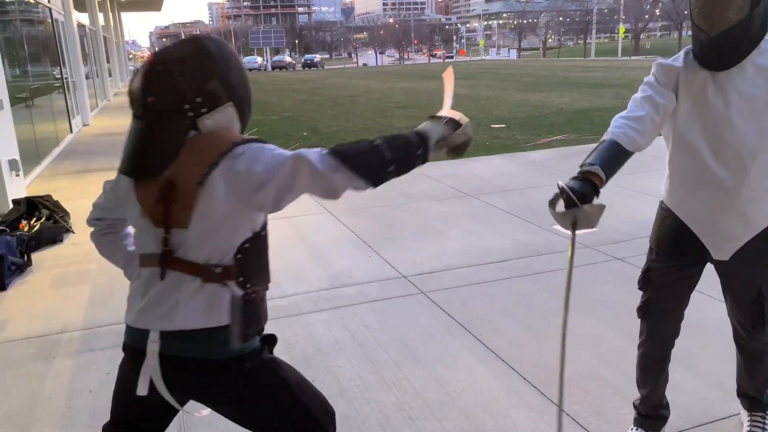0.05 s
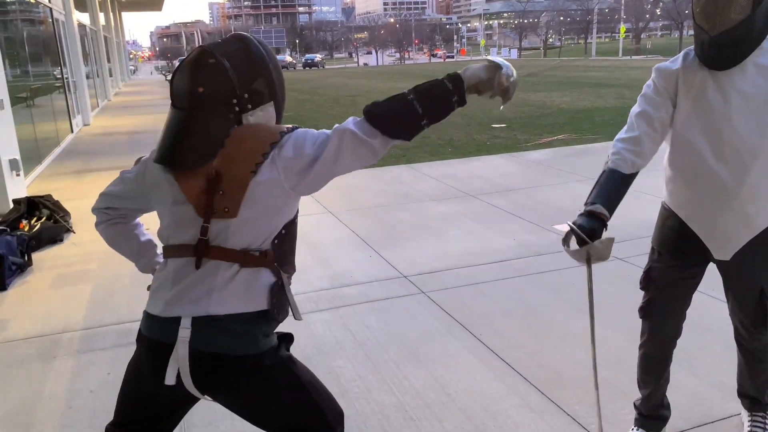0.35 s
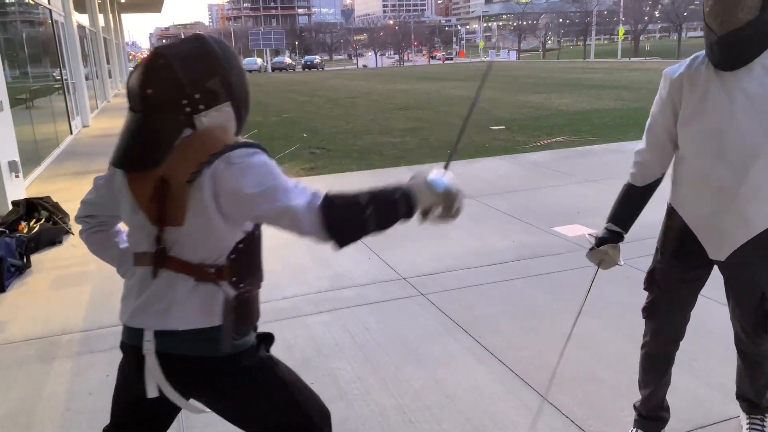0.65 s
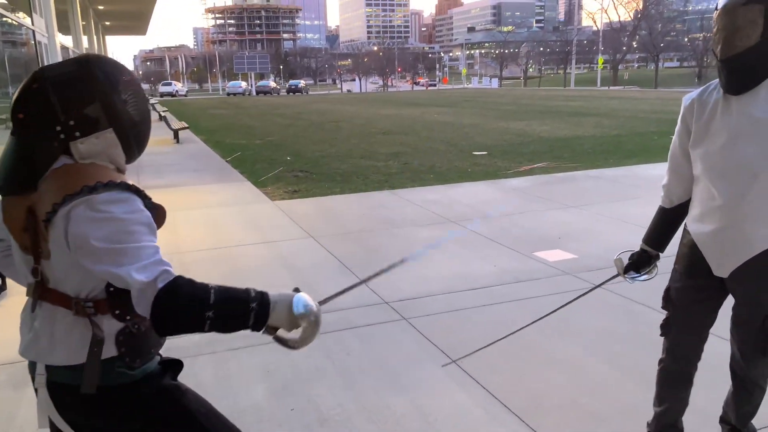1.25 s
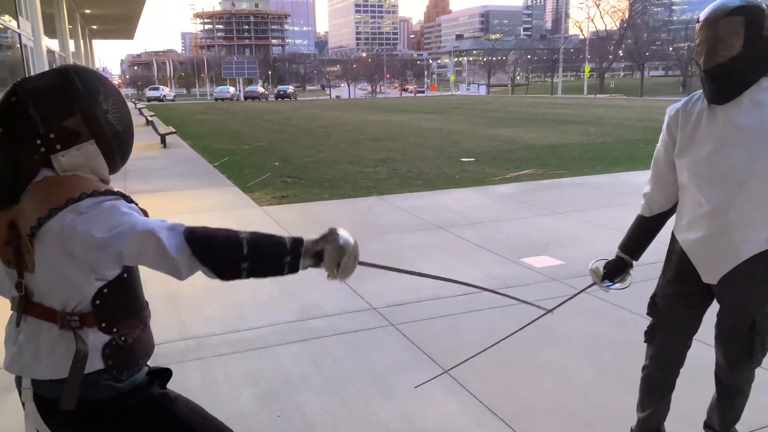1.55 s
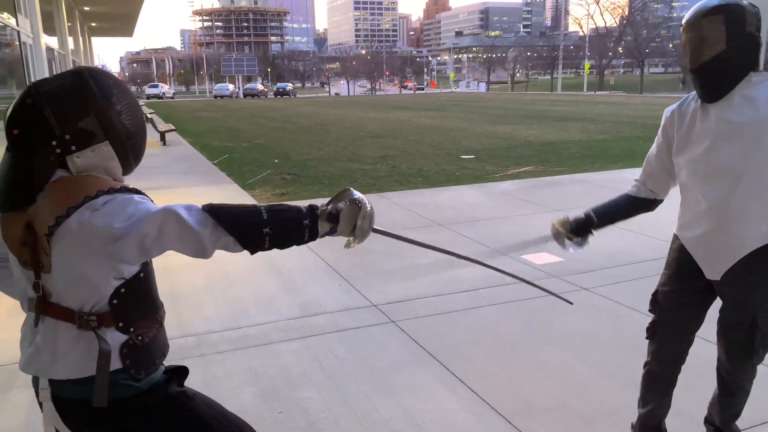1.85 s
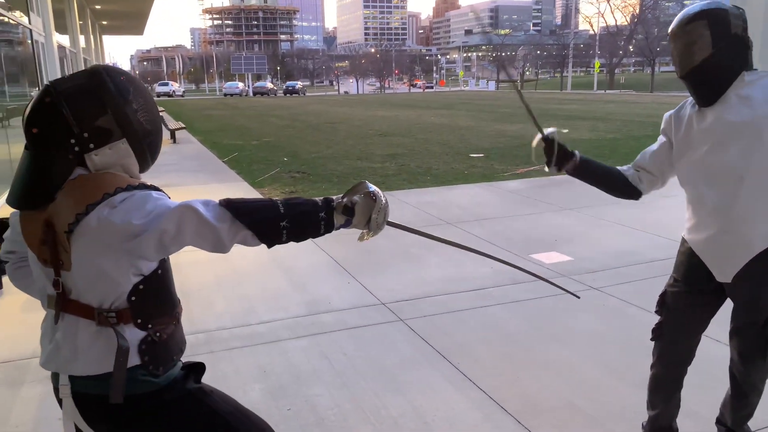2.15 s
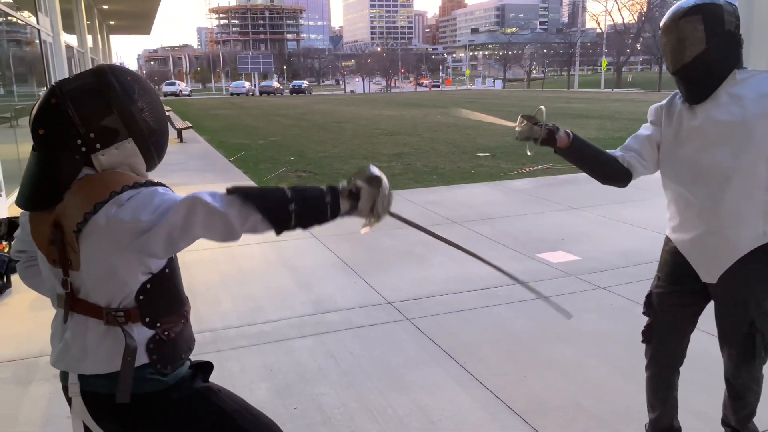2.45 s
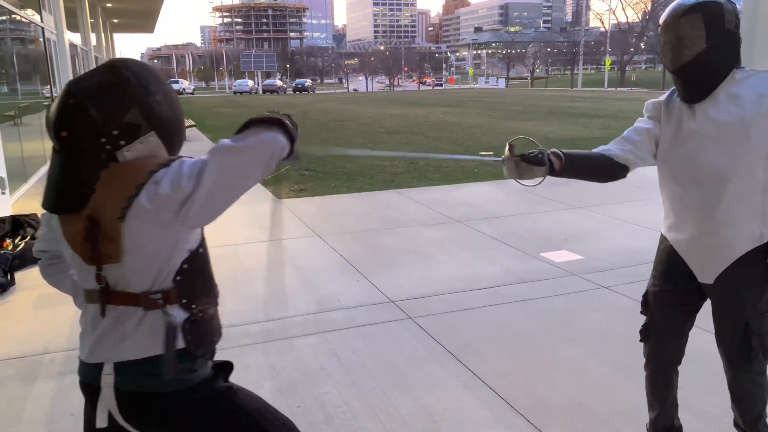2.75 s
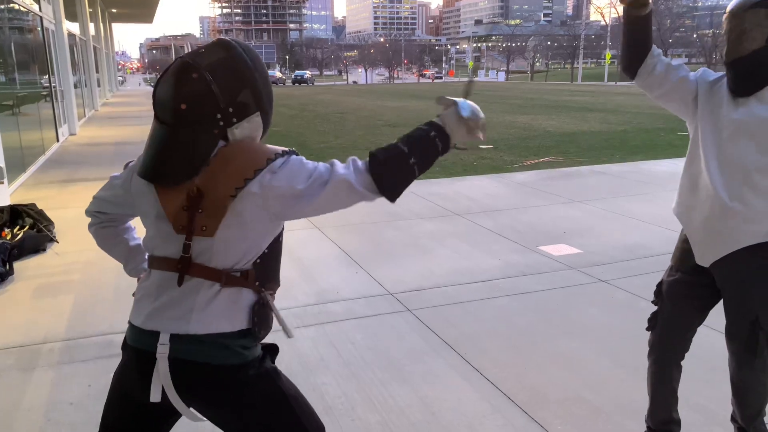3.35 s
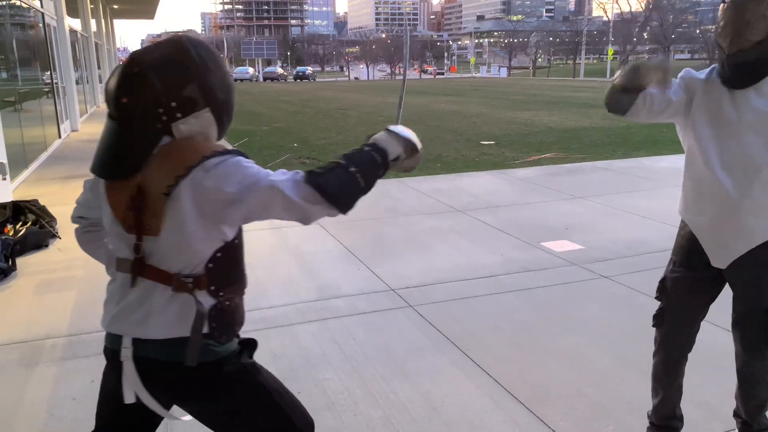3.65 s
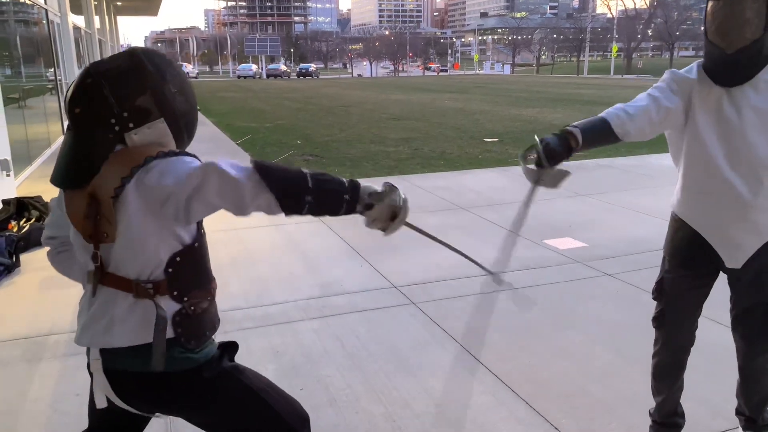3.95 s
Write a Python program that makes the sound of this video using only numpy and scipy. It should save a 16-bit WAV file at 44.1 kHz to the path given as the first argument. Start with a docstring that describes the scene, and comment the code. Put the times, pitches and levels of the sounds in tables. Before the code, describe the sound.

Steel sabres clash close by on an open plaza: one hit, a light clink, a pause, then three louder ringing strikes with a soft echo. Faint town traffic rumbles throughout.

```python
"""Sharp steel clashes crack and ring as two fencers spar with sabres on a concrete plaza, close by.
Each clash is a few quick contacts that set the blades' bending modes ringing; pavement and a near wall
scatter it, and far buildings send back a soft tail. Swung blades whistle faintly, a guard clinks,
buckles tick and a foot thuds once, while town traffic rumbles behind. A phone's limiter ducks the
hardest hits."""
import sys
import numpy as np
from scipy import signal
from scipy.fft import rfft, irfft
from scipy.io import wavfile
from scipy.ndimage import uniform_filter1d, minimum_filter1d, map_coordinates

SR = 44100
rng = np.random.default_rng(int(sys.argv[2]) if len(sys.argv) > 2 else 0)


def persist_wave(psi):
    """Save psi, clipped to +-1, as 16-bit WAV."""
    counts = np.round(np.clip(psi, -1, 1) * 32767).astype(np.int16)
    wavfile.write(sys.argv[1], SR, np.atleast_2d(counts).T)


N = 176400
T = np.arange(N) / SR
FREQS = np.maximum(np.fft.rfftfreq(N, 1 / SR), 1)

# EQ of the street rumble. Each row: frequency in Hz, relative level in dB.
TRAFFIC_EQ = [(20, -31.5), (30, -11), (50, 0), (115, 1), (185, -7.5), (240, -6.5), (400, -15), (650, -20.5),
              (1300, -23), (2000, -30), (3200, -43), (5000, -60), (8000, -64), (11000, -63.5), (16000, -85)]
# Fader ride on the rumble. Each row: time in seconds, level in dB.
TRAFFIC_RIDE = [(0, -45), (.9, -45.5), (1.6, -45.5), (2.4, -44.5), (3.2, -43), (4, -44.5)]
# Distant engines. Each row: pitch in Hz, width in Hz, mid-scene level in dB, rise in dB per second.
ENGINE_DRONES = [(109, 9, -59, 0.5), (130, 4.3, -59, 0.5), (228, 12, -59.5, 1.5), (286.6, 24, -60, 1.5),
                 (312, 45, -66.5, 5), (384.7, 28, -72.5, 6.5), (511, 45, -69, 5.5)]
# Stereo images of traffic and clash noise. Each row: frequency in Hz, left-right correlation.
TRAFFIC_IMAGE = [(60, .85), (290, .88), (480, 0.11), (700, -0.1), (1000, -.3), (1800, -0.41), (3000, 0.32)]
CLASH_IMAGE = [(200, .8), (900, 0.67), (2000, 0.15), (3500, 0.18), (6000, 0)]
# Buckle ticks. Each row: start in seconds, level in dB, centre in Hz, T60 in seconds.
BUCKLE_TICKS = [(1.076, -73.5, 6800, .08), (1.3447, -56, 8600, 0.0063), (1.363, -74, 7000, .03),
                (2.064, -70, 5500, 0.013)]
# Blade whistles. Each row: peak time in seconds, level in dB, centre in Hz, width in Hz,
# half length in seconds.
BLADE_SWISHES = [(2.54, -75, 4050, 250, 0.038), (3.214, -68, 2950, 150, .035),
                 (3.813, -64.5, 2420, 150, 0.043)]
# Modes of the guard's clink, the blades' short ring and the thin tones that sing on after it.
# Each row: frequency in Hz, relative level in dB, T60 in seconds.
GUARD_MODES = [(980, -53, .08), (2150, -46.5, .08), (2350, -50.5, 0.085), (2600, -58, 0.077)]
RING_MODES = [(605, -28, .2), (922, -21, .13), (1235, -20.5, .12), (1420, -14, 0.12), (1620, -12, .14),
              (1835, -11.5, .13), (1976, -10, .13), (2340, -19, .13), (2545, -18, .12), (3510, -12, .16),
              (3700, -10, .11), (3750, -11, 0.16), (4120, -10, 0.14), (4200, -7, .12), (4373, -14, .2),
              (4513, -12, .11), (4780, -12.5, 0.18), (5460, -11.5, 0.099), (6430, -8.5, .13),
              (7186, -6, .08), (7390, 0.5, .08), (7477, -5.5, .09), (8150, -4.5, .07), (7800, -2, .06),
              (9800, -3.5, 0.11), (9370, -7, 0.13), (10400, -3, 0.071), (10964, -4.5, .1), (11536, -4, .09)]
SINGING_MODES = [(2051, -42, 1.2), (2772, -36.5, 1.6), (2950, -44, 2), (3500, -46, 0.98),
                 (4377, -19.5, .42), (5700, -34.5, 0.43), (6700, -27.5, .5)]
# EQs of the far echo, near scatter and contact crack. Each row: frequency in Hz, relative level in dB.
ECHO_EQ = [(300, -11.5), (1500, -4), (2700, 0.5), (4300, 0), (7500, -3), (11000, -8.5), (16000, -27)]
SCATTER_EQ = [(150, -13.5), (330, -5), (560, -4.5), (760, -10), (1200, -3), (1700, -1), (2700, -1),
              (4300, 2), (6300, -0.5), (8500, 1.5), (11500, -3.5), (16000, -15.5)]
CRACK_EQ = [(150, -13.5), (600, -18), (1600, 0), (2700, -18.5), (4300, -2.5), (6000, -5), (8000, 4.5),
            (11500, 2.5), (16000, -1.5)]
# Decay of the far echo. Each row: frequency in Hz, T60 in seconds.
ECHO_DECAY = [(1000, 1.1), (2200, 0.55), (4000, 0.74), (6100, 0.52), (9000, 0.42), (15000, 0.18)]
# Hollow clangs of the guards. Each row: clash time in seconds, centre in Hz, width in Hz, boost in dB.
GUARD_CLANGS = [(0.2913, 634, 55, 9.5), (0.2913, 940, 90, 4.5), (0.2913, 1276, 110, 4.5),
                (0.2913, 1700, 90, 1.5), (2.6751, 1200, 55, 8.5), (2.6751, 4020, 170, 3.5),
                (2.6751, 1630, 250, 6), (2.6751, 5580, 120, 5.5), (3.2512, 884, 130, 11),
                (3.2512, 1412, 90, 6.5), (3.2512, 2030, 130, 2.5), (3.2512, 7280, 160, 4),
                (3.8735, 300, 35, 12.5), (3.8735, 913, 80, 6), (3.8735, 4170, 200, 1.5),
                (3.8735, 1857, 272, 6), (3.8735, 7860, 99, 8)]
# Blade chatter after the first touch. Each row: time in seconds, weight within its clash in dB.
BLADE_REBOUNDS = [(0.2941, 7), (0.302, -8), (1.2170, 3), (2.6770, 3.5), (2.6818, -3.5), (2.6917, -2.5),
                  (3.254, 4), (3.2566, 5), (3.2595, 2.5), (3.8751, 7.5), (3.8803, -0.5), (3.8850, -1),
                  (3.9030, -11)]
# The hits. Each row: start in seconds, level in dB, bass, treble and ring trims in dB, place on the
# blade from 0 to 1, then scatter, echo, bite and singing trims in dB.
SABRE_CLASHES = [(0.291, -12.5, 12.5, -13.5, -6.5, 0.14, 1.5, -7, 0.5, -13),
                 (1.2090, -33.5, 5, -22, 0.5, 1, 2.5, -6, -3, -12),
                 (2.675, 3.5, -2.5, 3, 3, .603, 3.5, -7, -0.5, 0),
                 (3.2511, 6.5, -2, 3.5, 0.5, .468, 1, -7, 0, -14.5),
                 (3.8734, 6.5, -4, 0.5, 0, .705, 0, -5.5, 3, -9)]

SWELL_DB, SWELLS_PER_S, BASS_LEFT_DB = 2.336, 8, 3.5
STEP_S, STEP_HZ, STEP_WIDTH_S, STEP_DB = 3.486, 84, 0.0055, -25.5
CLINK_S, CLINK_RISE_S = 1.218, .003
ECHO_DB, ECHO_BUILD_S, ECHO_BUILD_POWER = -44, 0.16, .3
SCATTER_DB, SCATTER_RISE_S, SCATTER_T60_S = -19.5, 0.0096, 0.22
WAVER_HZ, WAVER_DB, WAVERS_PER_S = 24, 8, 16
RING_DB, BEND_HZ, MODE_BLUR_HZ = -22, 6, 15
NODE_SHARE = 0.27  # what a mode still gets when struck on a node
CLUSTER_DB, CLUSTER_SPACING_HZ, CLUSTER_FULL_HZ = 5.76, 100, 2500
BITE_HZ, BITE_OCTAVES = 4300, 0.34
CRACK_DB, CRACK_T60_S, SNAP_DB, SNAP_T60_S = -8, .035, -9, 0.0028
LIMIT_DB, LIMIT_HOLD_S, LIMIT_RELEASE_DB_PER_S = -10, 0.097, 78
SPLIT_HZ, OPPOSED_HZ, PORT_LAG_S, TOP_HZ = 6900, 8650, .000206, 15900


def undb(db):
    """Decibels to gain."""
    return 10 ** (np.asarray(db) / 20)


def curve(points):
    """A table's value at every frequency, joined on a log axis."""
    hz, value = np.array(points, float).T
    return np.interp(np.log(FREQS), np.log(hz), value)


def band(hz, width):
    """Gain curve of a resonant peak."""
    return 1 / (1 + (2 * (FREQS - hz) / width) ** 2)


def shape(x, gain):
    """Filter by a gain at every frequency."""
    return irfft(rfft(x) * gain, N)


def noise(gain, image=0):
    """Stereo noise of rms 1 with a given spectrum and left-right correlation."""
    image = np.clip(image, -.98, .98)
    gain = gain / np.sqrt(np.mean(gain ** 2))
    mid, side = (shape(rng.standard_normal(N), gain * np.sqrt((1 + sign * image) / 2))
                 for sign in (1, -1))
    return np.array([mid + side, mid - side])


def fade(age, t60):
    """Exponential decay from age zero on."""
    return (age >= 0) * np.exp(-np.log(1000) * np.clip(age / t60, 0, 10))


def wander(count, size):
    """Smooth random drift through about count points, with a spread near 1."""
    points = rng.standard_normal(2048)
    return map_coordinates(points, [np.linspace(0, count, size)], order=3, mode="wrap")


def limiter(x):
    """Loud hits pull the gain down; it holds, then creeps back."""
    power = uniform_filter1d(np.mean(x ** 2, axis=0), size=132)
    over_db = np.maximum(10 * np.log10(np.maximum(power, 1e-12)) - LIMIT_DB, 0)
    half = int(LIMIT_HOLD_S * SR / 2)
    held = -minimum_filter1d(-over_db, 2 * half + 1, origin=half, mode="constant")
    release = LIMIT_RELEASE_DB_PER_S * T
    cut_db = np.maximum.accumulate(held + release) - release
    return x * undb(-uniform_filter1d(cut_db, size=88))


def traffic():
    """A bed of far streets and droning engines; the low end swells unevenly and leans left."""
    image = curve(TRAFFIC_IMAGE)
    ride = undb(np.interp(T, *np.array(TRAFFIC_RIDE).T))
    roar = ride * noise(undb(curve(TRAFFIC_EQ)) / np.sqrt(1 + np.clip(image, -.5, 1)), image)
    bass = shape(roar, 1 / (1 + (FREQS / 300) ** 4))
    roar = roar - bass + bass * undb(SWELL_DB * wander(SWELLS_PER_S * N / SR, N))
    engines = sum(undb(db + rise * (T - T.mean())) * noise(band(hz, width), image)
                  for hz, width, db, rise in ENGINE_DRONES)
    lean_db = BASS_LEFT_DB / (1 + (FREQS / 900) ** 2)
    return shape(roar + engines, undb(np.array([lean_db, -lean_db]) / 2))


def footfall():
    """A soft sole lands: one low thump."""
    age = T - STEP_S
    return undb(STEP_DB) * np.cos(2 * np.pi * STEP_HZ * age) * np.exp(-(age / STEP_WIDTH_S) ** 2)


def gear():
    """A guard clinks once after the lightest touch; buckles tick faintly."""
    age = np.maximum(T - CLINK_S, 0)
    clink = sum(undb(db) * fade(age, t60) * np.sin(2 * np.pi * hz * age) for hz, db, t60 in GUARD_MODES)
    attack = 1 - np.exp(-age / CLINK_RISE_S)
    ticks = sum(undb(db) * fade(T - start, t60) * noise(1 / (1 + (2 * np.log2(FREQS / hz)) ** 2))
                for start, db, hz, t60 in BUCKLE_TICKS)
    return attack * clink + ticks


def swishes():
    """Air sheds off a fast blade in a narrow band, swelling and fading with the swing."""
    return sum(undb(db) * np.exp(-((T - peak) / half_length) ** 2) * noise(band(hz, width))
               for peak, db, hz, width, half_length in BLADE_SWISHES)


def far_echo(age, hiss):
    """Returns from the buildings build up, then die away, the top end first."""
    out, spectrum = 0, rfft(hiss)
    hz = np.fft.rfftfreq(len(age), 1 / SR)
    edges_hz = [0, 1500, 2500, 3500, 4500, 5500, 6500, 7500, 9000, 10500, 12500, SR / 2]
    build = np.clip(age / ECHO_BUILD_S, 0, 1) ** ECHO_BUILD_POWER
    for lo, hi in zip(edges_hz, edges_hz[1:]):
        t60 = np.interp(np.sqrt(max(lo, hi / 2) * hi), *np.array(ECHO_DECAY).T)
        env = build * fade(np.maximum(age - ECHO_BUILD_S, 0), t60)
        out = out + env * irfft(spectrum * ((hz >= lo) & (hz < hi)), len(age))
    return out


def near_scatter(age, hiss):
    """Pavement and a near wall throw back a quick, dense splash."""
    return (1 - np.exp(-age / SCATTER_RISE_S)) * fade(age, SCATTER_T60_S) * hiss


def singing(age):
    """Long thin modes waver in pitch and level as the blade swings away."""
    out, turns = 0, WAVERS_PER_S * len(age) / SR
    for hz, db, t60 in SINGING_MODES:
        pitch = hz + WAVER_HZ * wander(turns, len(age))
        phase = np.cumsum(pitch) / SR + rng.random((2, 1)) / 2
        env = undb(db + WAVER_DB * wander(turns, len(age))) * fade(age, t60)
        out = out + env * np.sin(2 * np.pi * phase)
    return out


def ring(age, contacts, place, colour):
    """Bending modes, each as strong as it moves at the struck place; every contact feeds them anew."""
    out = np.zeros((2, len(age)))
    for hz, db, t60 in RING_MODES:
        motion = NODE_SHARE + abs(np.sin(np.pi * place * np.sqrt(hz / BEND_HZ)))
        gain = undb(db) * np.interp(hz, FREQS, colour) * motion
        env = np.sqrt(sum((size * fade(age - at, t60)) ** 2 for at, size in contacts))
        # rubbing steel smears the pitch
        blur = np.cumsum(rng.standard_normal(len(age))) * np.sqrt(MODE_BLUR_HZ / (2 * np.pi * SR))
        phase = rng.random() + min(hz / 8000, 1) * rng.random((2, 1))
        out += gain * env * np.sin(2 * np.pi * (hz * age + blur + phase))
    return out


def mode_clusters():
    """Countless weaker modes crowd together and leave lumps in the spectrum."""
    ripple = np.clip(wander(SR / 2 / CLUSTER_SPACING_HZ, len(FREQS)), -1.25, 1.25)
    lumps = undb(CLUSTER_DB * np.minimum(FREQS / CLUSTER_FULL_HZ, 1) * ripple)
    return lumps / np.sqrt(uniform_filter1d(lumps ** 2, size=2000))


def clash_colour(start, bass_db, treble_db, bite_db):
    """EQ of one hit: bass and treble shelves, the guards' clangs and an upper-mid bite."""
    shelves = bass_db / (1 + (FREQS / 1800) ** 2) + treble_db / (1 + (9500 / FREQS) ** 6)
    clangs = sum(db * np.exp(-((FREQS - centre) / width) ** 2)
                 for at, centre, width, db in GUARD_CLANGS if abs(at - start) < .1)
    bite = bite_db * np.exp(-(np.log2(FREQS / BITE_HZ) / BITE_OCTAVES) ** 2)
    return undb(shelves + clangs + bite)


def disperse(x):
    """Low bending waves travel along the blade more slowly than high ones."""
    size = 2 * x.shape[-1]
    hz = np.fft.rfftfreq(size, 1 / SR)
    slowness = np.sqrt(1000 / np.maximum(hz, 400))
    lag_s = .003 * np.maximum(slowness - np.sqrt(.1), 0)  # no lag above 10 kHz
    phase = np.cumsum(lag_s) * hz[1]
    return irfft(rfft(x, size) * np.exp(-2j * np.pi * phase), size)[:, :size // 2]


def chatter(start):
    """First touch and rebounds as (delay in seconds, strength), scaled to a total energy of 1."""
    rebounds = [(max(at - start, 0), undb(db)) for at, db in BLADE_REBOUNDS if abs(at - start) < .1]
    contacts = [(0, 0.68)] + rebounds
    total = np.sqrt(sum(size ** 2 for _, size in contacts))
    return [(at, size / total) for at, size in contacts]


def crack(age, contacts, hiss):
    """Each contact fires a short noise burst with a hard snap on the front."""
    power = 0
    for at, size in contacts:
        burst = undb(CRACK_DB) * fade(age - at, CRACK_T60_S) + undb(SNAP_DB) * fade(age - at, SNAP_T60_S)
        power = power + (size * burst) ** 2
    return np.sqrt(power) * hiss


def sabres():
    """Steel meets steel: every clash layers crack, ring and singing with near scatter and far echo."""
    out = np.zeros((2, N + SR))
    age, image = T[:SR], curve(CLASH_IMAGE)
    hisses = [noise(undb(curve(eq)), image) for eq in (CRACK_EQ, SCATTER_EQ, ECHO_EQ)]
    for start, db, bass_db, treble_db, ring_db, place, near_db, far_db, bite_db, sing_db in SABRE_CLASHES:
        contacts = chatter(start)
        colour = clash_colour(start, bass_db, treble_db, bite_db)
        lumps = mode_clusters()
        cut = rng.integers(N - SR)
        crack_hiss, near_hiss, far_hiss = (shape(hiss, colour * lumps ** depth)[:, cut:cut + SR]
                                           for hiss, depth in zip(hisses, (1.3, 1, .5)))
        steel = undb(RING_DB + ring_db) * ring(age, contacts, place, colour)
        steel += undb(RING_DB + sing_db) * singing(age)
        direct = disperse(crack(age, contacts, crack_hiss) + steel)
        near = undb(SCATTER_DB + near_db) * near_scatter(age, near_hiss)
        far = undb(ECHO_DB + far_db) * far_echo(age, far_hiss)
        i = int(start * SR)
        out[:, i:i + SR] += undb(db) * (direct + near + far)
    return out[:, :N]


def scene():
    """Sabres up front, with swishes, gear and a footfall over the traffic bed."""
    return sabres() + swishes() + gear() + footfall() + traffic()


def record(dry):
    """A phone's sound: one treble signal, phase-shifted between the sides; peaks limited, top cut."""
    size = 2 * N
    hz = np.fft.rfftfreq(size, 1 / SR)
    left, right = rfft(dry, size)
    crossfade = np.pi / 2 / (1 + (SPLIT_HZ / np.maximum(hz, 1)) ** 20)
    shifted_left = -left * np.exp(2j * np.pi * (hz - OPPOSED_HZ) * PORT_LAG_S)
    right = np.cos(crossfade) * right + np.sin(crossfade) * shifted_left
    wide = irfft(np.array([left, right]), size)[:, :N]
    limited = np.clip(limiter(wide), -1, 1)
    return signal.sosfilt(signal.ellip(10, .2, 90, TOP_HZ, fs=SR, output="sos"), limited)


dry = scene()
out = record(dry)
persist_wave(out)
```